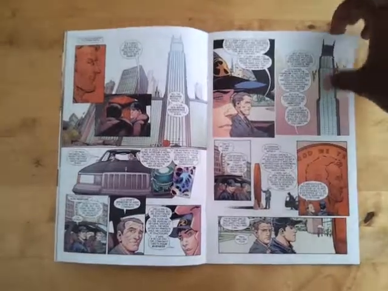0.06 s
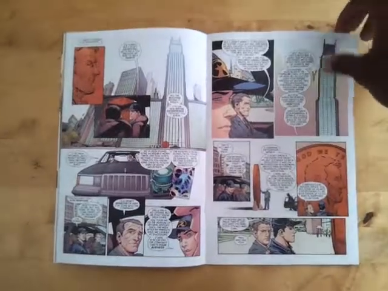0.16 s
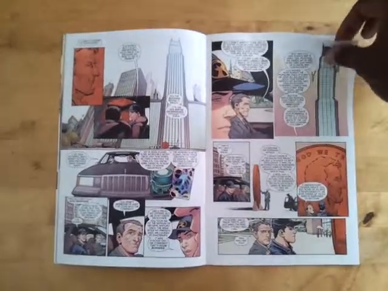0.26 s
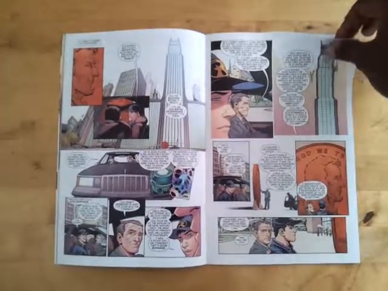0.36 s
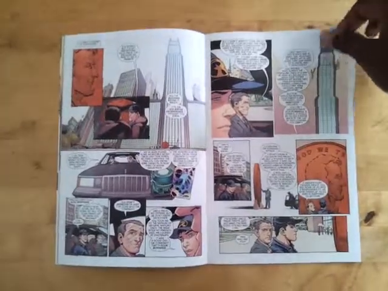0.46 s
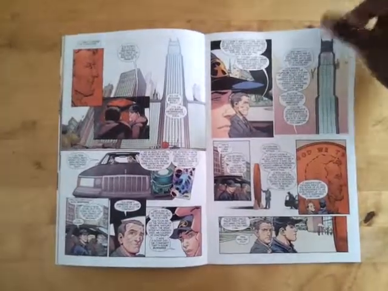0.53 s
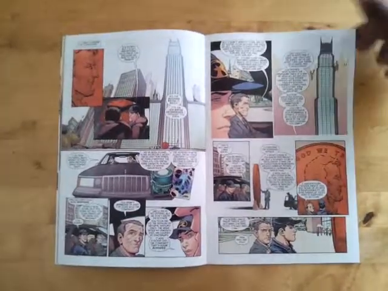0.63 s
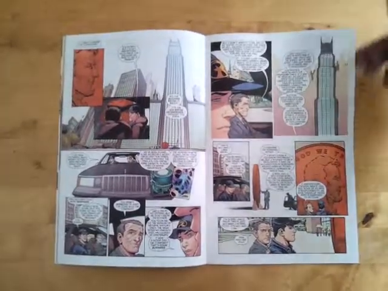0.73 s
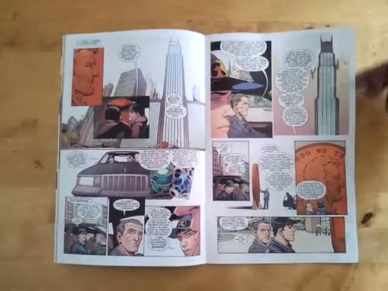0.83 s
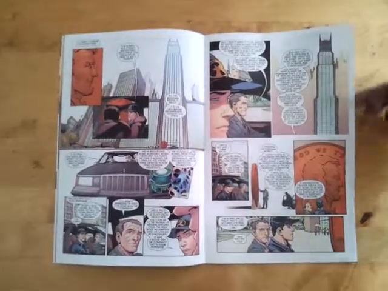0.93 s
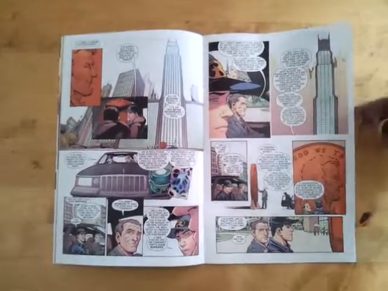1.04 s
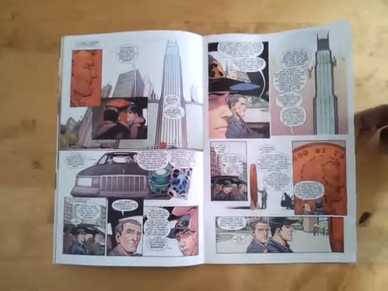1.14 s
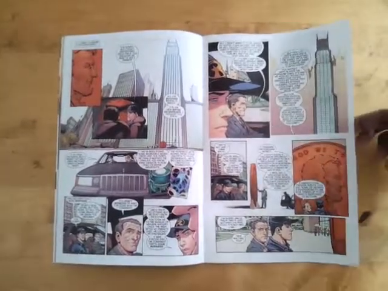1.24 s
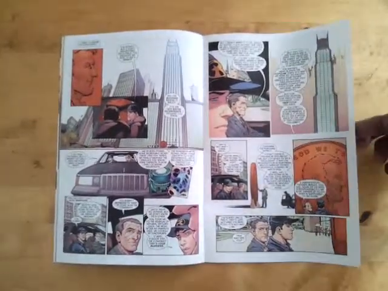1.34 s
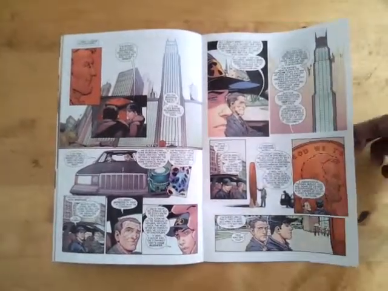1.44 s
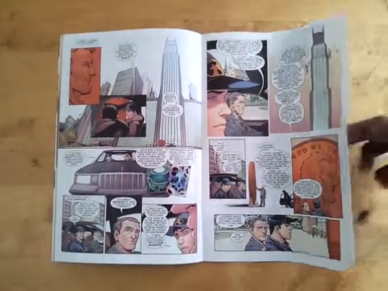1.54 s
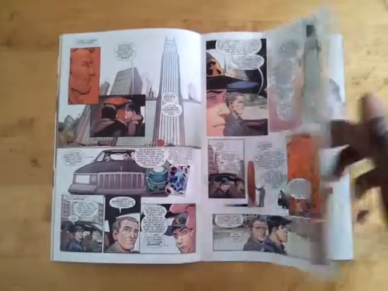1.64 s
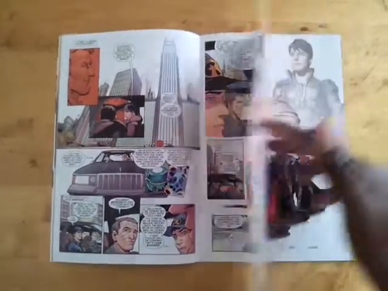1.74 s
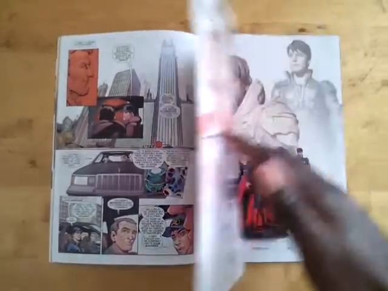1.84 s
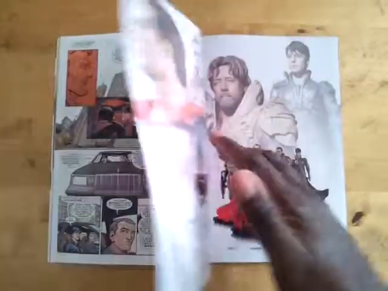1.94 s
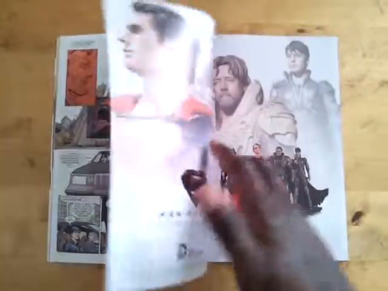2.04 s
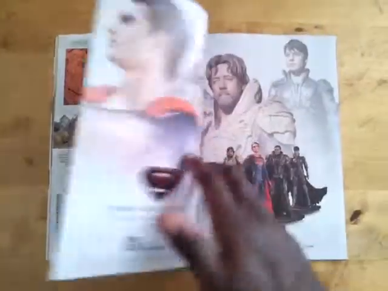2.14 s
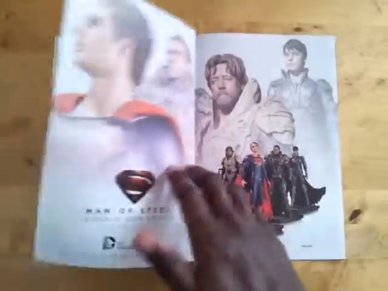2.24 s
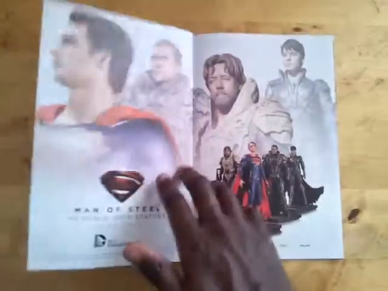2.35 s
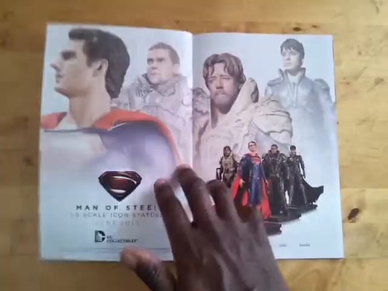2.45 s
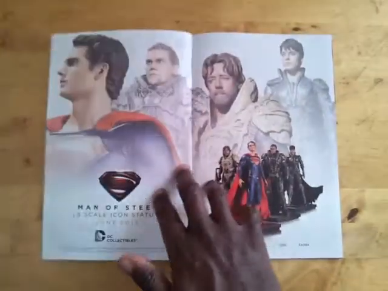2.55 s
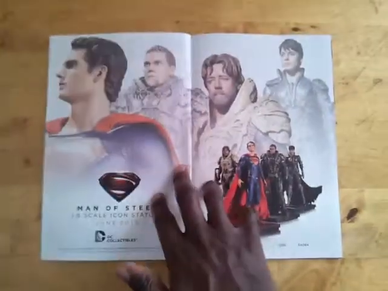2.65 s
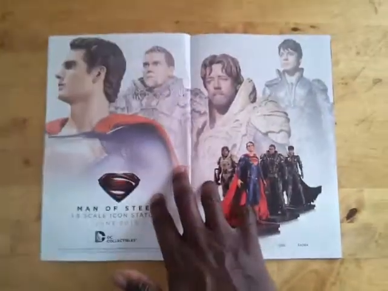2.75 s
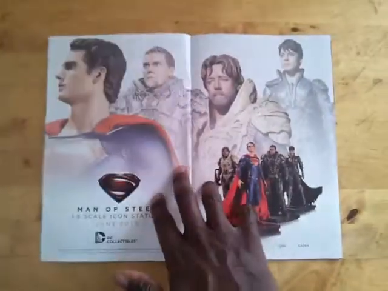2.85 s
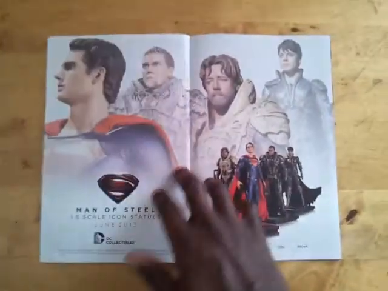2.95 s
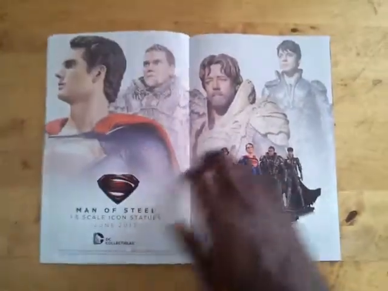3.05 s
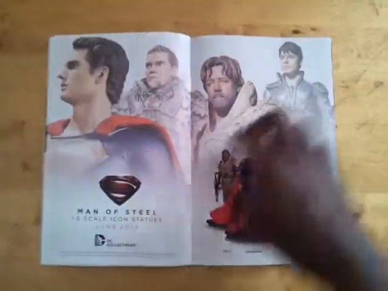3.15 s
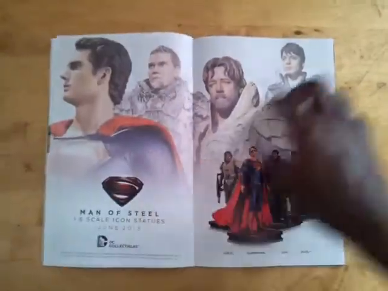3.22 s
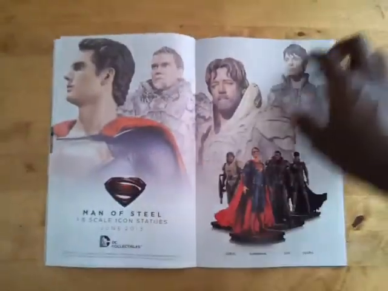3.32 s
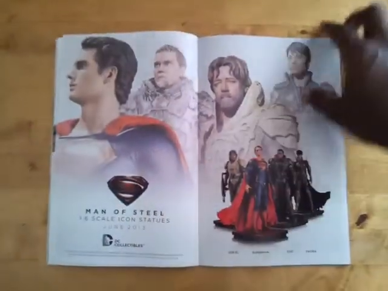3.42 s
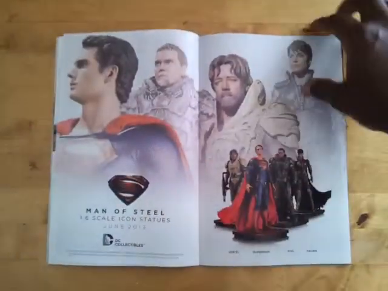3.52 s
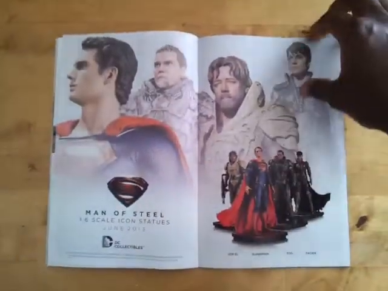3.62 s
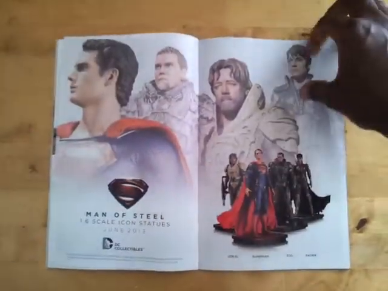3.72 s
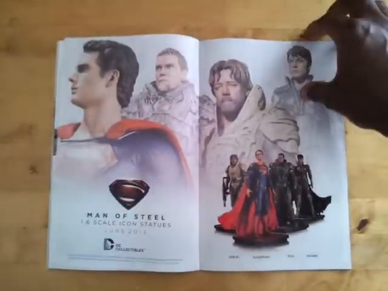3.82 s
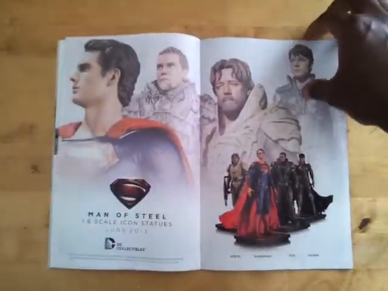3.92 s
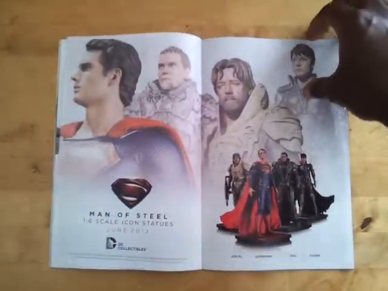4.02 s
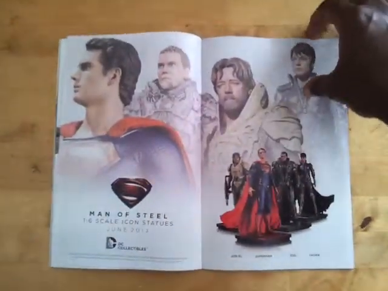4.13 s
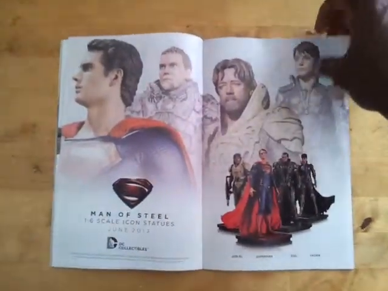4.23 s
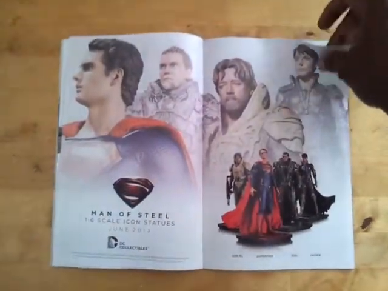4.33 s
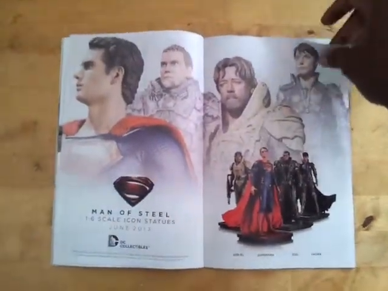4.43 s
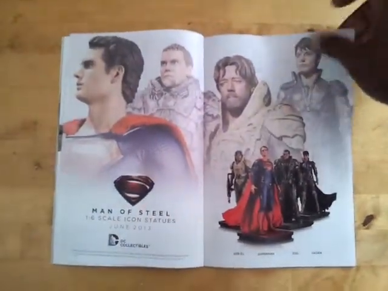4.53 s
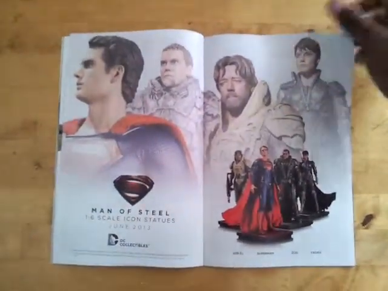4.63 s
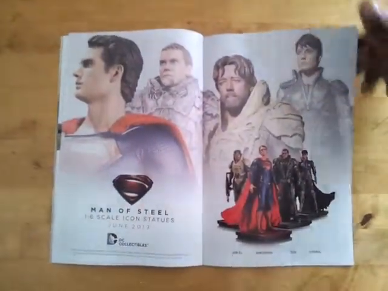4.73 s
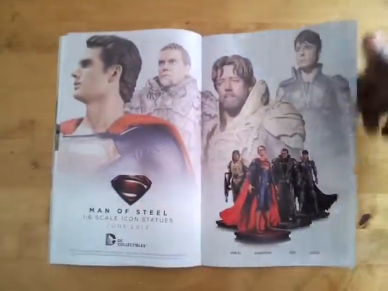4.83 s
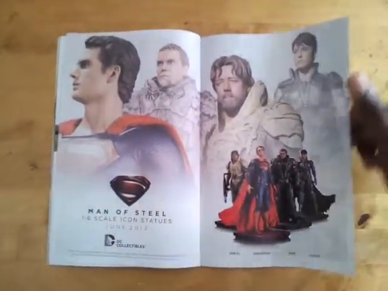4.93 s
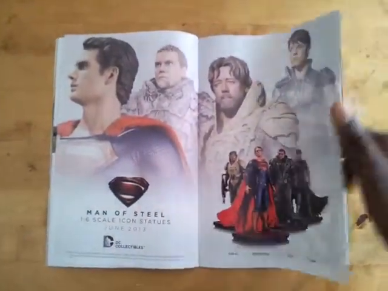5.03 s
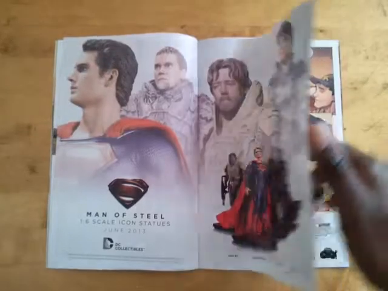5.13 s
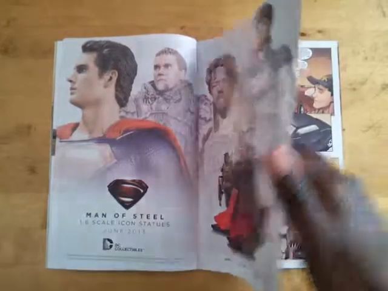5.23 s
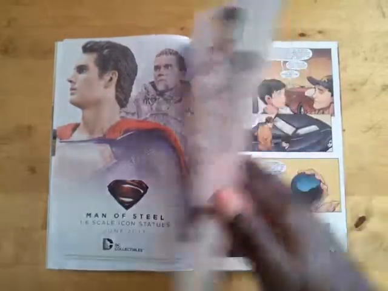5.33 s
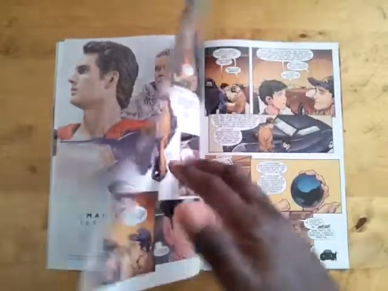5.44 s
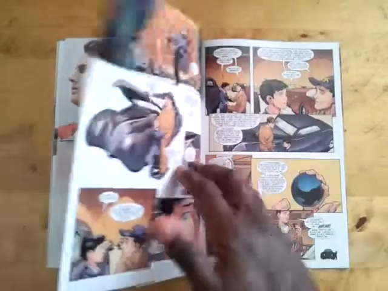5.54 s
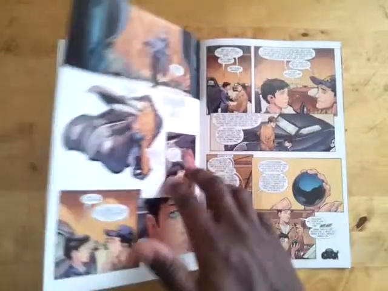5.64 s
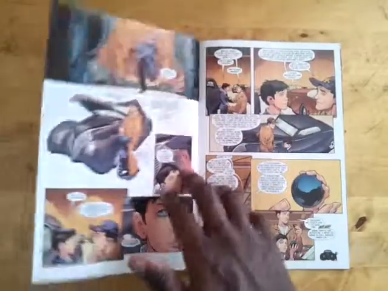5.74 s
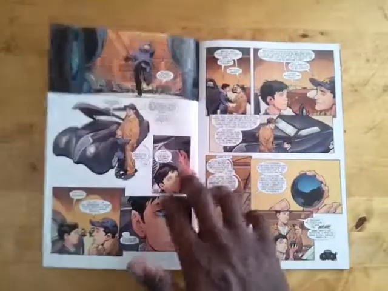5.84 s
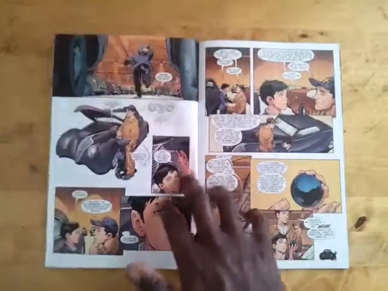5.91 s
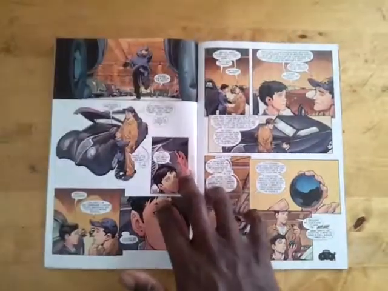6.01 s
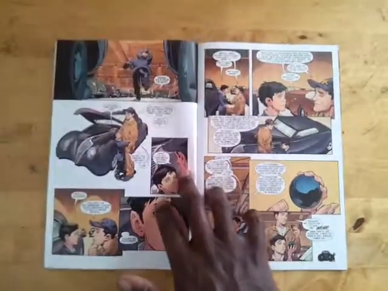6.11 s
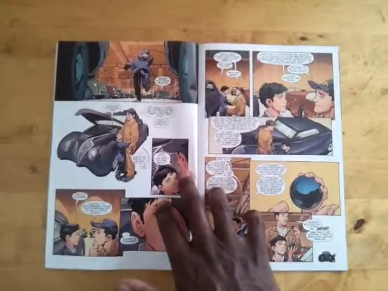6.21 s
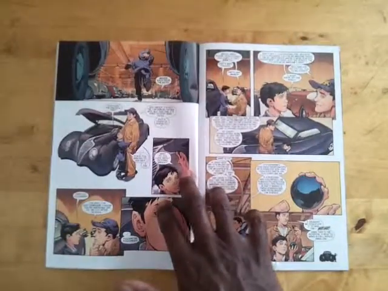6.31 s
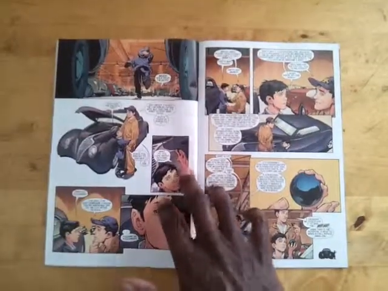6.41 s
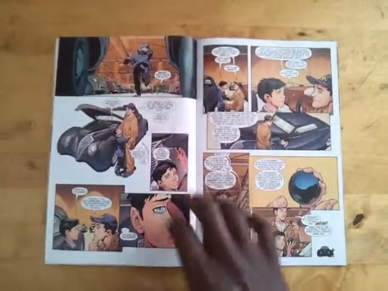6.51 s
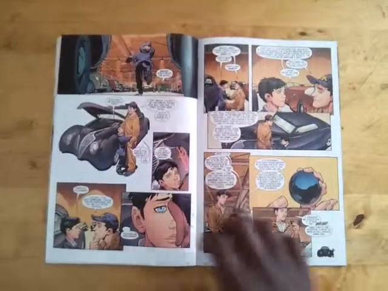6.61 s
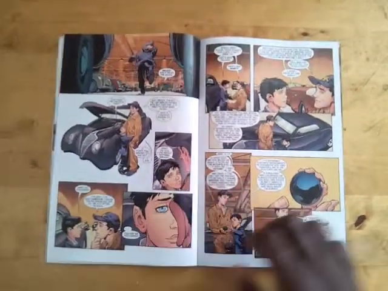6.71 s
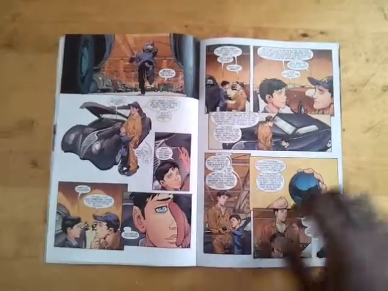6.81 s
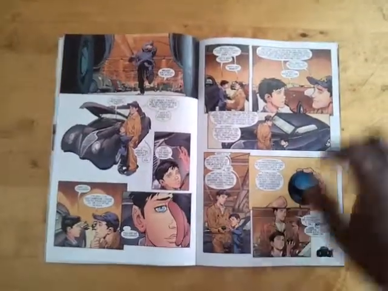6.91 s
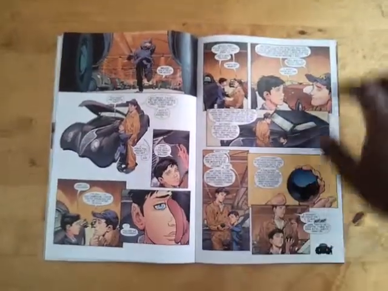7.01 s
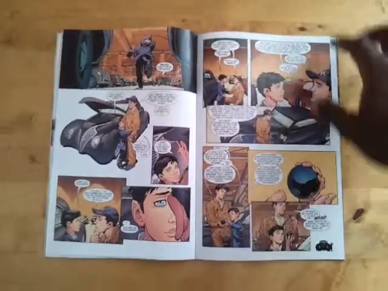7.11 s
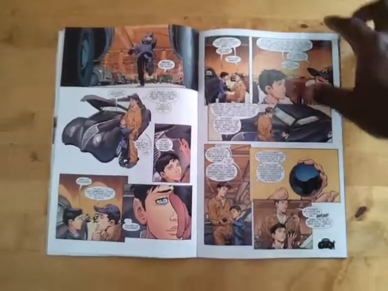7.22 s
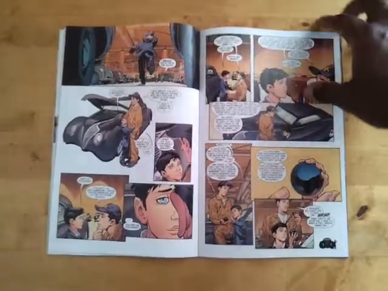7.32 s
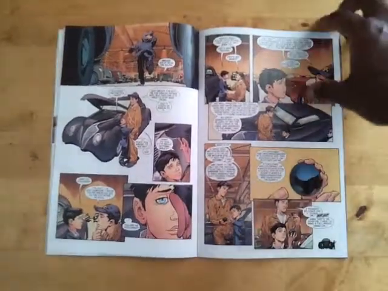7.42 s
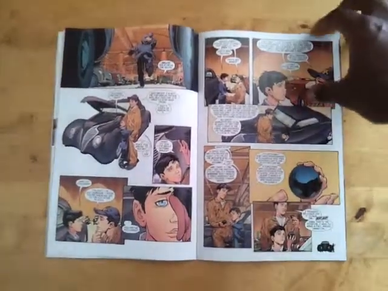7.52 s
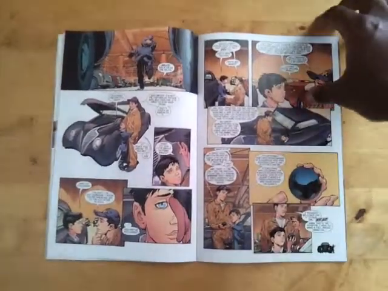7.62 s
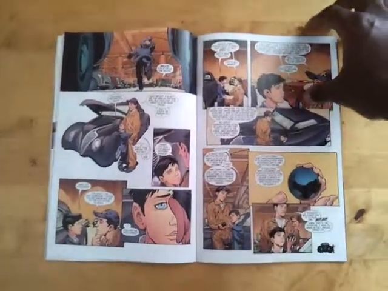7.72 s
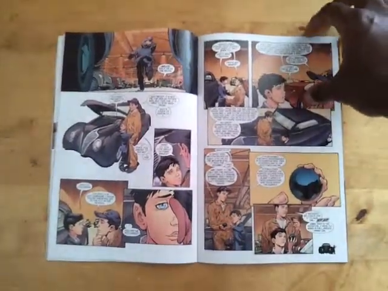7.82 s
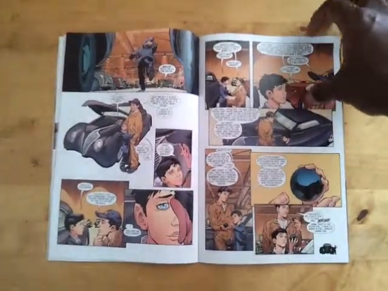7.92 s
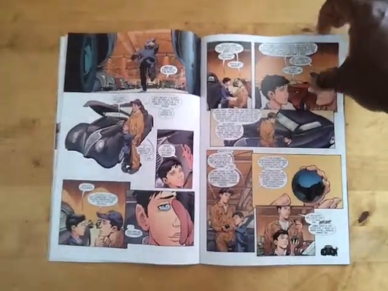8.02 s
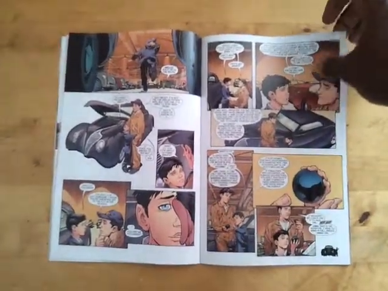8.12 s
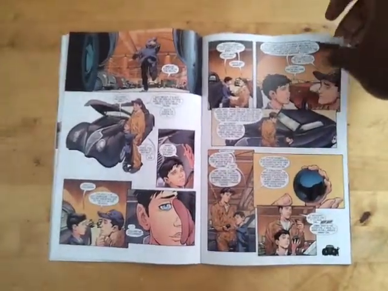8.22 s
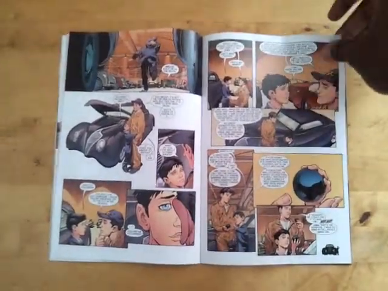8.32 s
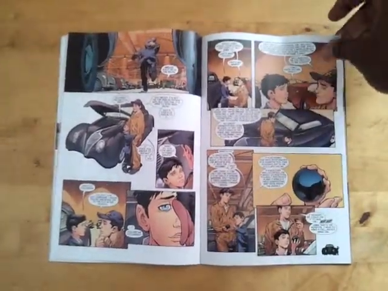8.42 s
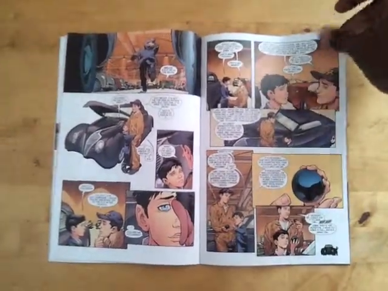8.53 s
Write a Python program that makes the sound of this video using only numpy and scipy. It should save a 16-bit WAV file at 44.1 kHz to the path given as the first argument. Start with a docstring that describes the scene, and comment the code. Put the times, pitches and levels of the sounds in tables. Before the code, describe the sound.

Close, dry mono sound of thin magazine paper on a wooden table. Bright fingertip hisses and clicks come first, then a soft flapping page turn with crackles. Fingers work the next corner with brisk scratches and snaps, and the second sheet cracks over and settles. Light touches, near silence, then another bright scrape and flick at the end. Faint room tone and small air puffs lie beneath.

```python
"""A small, quiet room with a wooden table: a hand leafs through a comic book close to a mono microphone.
Fingers slide over glossy paper (stick-slip noise) and flick the corner free; the lifted sheet bends
(a swarm of soft impulses), buckles with sharp snaps (filtered impulses with decaying rattle) and settles
on the other side. Two pages are turned and a third is picked up. Shaped noise gives room tone, rumble and air."""
import sys
import numpy as np
from scipy import signal
from scipy.fft import rfft, irfft, next_fast_len
from scipy.io import wavfile
from scipy.ndimage import uniform_filter1d, map_coordinates

SR = 44100
rng = np.random.default_rng(int(sys.argv[2]) if len(sys.argv) > 2 else 0)


def output_pcm(signal):
    """Save a mono or channel-first signal as 16-bit PCM at the path in sys.argv[1].

    Samples are clipped to [-1, 1] before scaling.
    """
    pcm = np.clip(np.atleast_2d(signal).T, -1, 1) * 32767
    wavfile.write(sys.argv[1], SR, np.round(pcm).astype(np.int16))


N = 377496


def amp(db):
    """Decibels to gain."""
    return 10 ** (np.asarray(db) / 20)


def unit(x):
    """Scale to rms 1."""
    return x / np.sqrt(np.mean(x ** 2) + 1e-20)


def along(points, f_hz):
    """Interpolate (f/Hz, value) points on a log-frequency axis."""
    point_hz, value = np.transpose(points)
    return np.interp(np.log(f_hz + 1), np.log(point_hz + 1), value)


def wobble(rate_hz):
    """Smooth random curve through rate_hz Gaussian knots a second."""
    knots = rng.standard_normal(int(N * rate_hz / SR) + 4)
    return map_coordinates(knots, [np.arange(N) * rate_hz / SR])


def filtered(x, response):
    """Multiply the spectrum of x by response(f_hz)."""
    size = next_fast_len(N + SR // 2)
    f_hz = np.fft.rfftfreq(size, 1 / SR)
    return irfft(rfft(x, size) * response(f_hz), size)[:N]


def coloured(x, spectrum):
    """Filter x by a (f/Hz, level/dB) spectrum, then scale to rms 1."""
    return unit(filtered(x, lambda f_hz: amp(along(spectrum, f_hz))))


def causal(gain):
    """Minimum-phase impulse response of a gain curve: it rings only after the blow."""
    cepstrum = irfft(np.log(np.maximum(gain, 1e-6)))
    half = len(cepstrum) // 2
    cepstrum[1:half] *= 2
    cepstrum[half + 1:] = 0
    return irfft(np.exp(rfft(cepstrum)))


def slips(rate_hz, spread_db):
    """Stick-slip: random impulses of either sign and uneven size, rate_hz a second on average, at rms 1."""
    hits = rng.random(N) < rate_hz / SR
    sign = rng.choice([-1, 1], N)
    size = amp(spread_db * rng.standard_normal(N))
    return unit(hits * sign * size)


def arches(movements, peak, steepness):
    """Gain per level column: each movement swells and dies in one arch; overlaps add in power.

    peak: share of the length at which it peaks; steepness: exponent of the flanks."""
    t = np.arange(N) / SR
    power = np.zeros((len(movements[0]) - 2, N))
    for start_s, length_s, *levels_db in movements:
        during = (t > start_s) & (t < start_s + length_s)
        share = (t[during] - start_s) / length_s
        phase = np.interp(share, [0, peak, 1], [0, np.pi / 2, np.pi])
        arch = np.abs(np.sin(phase)) ** steepness
        power[:, during] += np.outer(amp(levels_db), arch) ** 2
    return np.sqrt(power)


def room(x, build_s=0.0021, early=0.37, early_decay_s=0.0068):
    """Table and near walls answer first, then a diffuse noise tail decays at a rate set by frequency."""
    # reverberation: f/Hz, t60/s
    walls = [(300, 0.85), (1500, 0.32), (5000, 0.36), (11000, 0.35)]
    f_hz, t, noise = signal.stft(rng.standard_normal(SR // 2), SR, nperseg=256)
    decay = amp(-60 * t / along(walls, f_hz)[:, None])
    tail = signal.istft(noise * decay, SR, nperseg=256)[1]
    age_s = np.arange(len(tail)) / SR
    tail = tail * (1 - np.exp(-(age_s / build_s) ** 2))
    tail = tail * (1 + early * np.exp(-age_s / early_decay_s))
    return signal.fftconvolve(x, tail / np.linalg.norm(tail))[:N]


def room_tone():
    """Steady room tone: stationary shaped noise."""
    # relative spectrum: f/Hz, level/dB
    tone_spectrum = [(35, -43), (60, -7.5), (102, -3), (136, -6), (265, -7.5), (309, -10), (413, -10),
                     (751, -12.5), (821, -15), (1310, -16.5), (1780, -18.5), (11200, -23.5), (12000, -31.5),
                     (15600, -55), (22000, -120)]
    return amp(-59.0) * coloured(rng.standard_normal(N), tone_spectrum)


def rumble():
    """Low background rumble: shaped noise on a slow level curve."""
    # level curve before a fixed trim: t/s, level/dB
    rumble_levels = [(0.0, -51.5), (1.22, -61.5), (7.94, -69), (8.56, -63)]
    # relative spectrum: f/Hz, level/dB
    rumble_spectrum = [(50, -17), (90, -20), (125, 5), (180, -6), (280, 0.5), (450, -9.5), (750, -6.5),
                       (1500, -14), (4000, -27)]
    trim_db = -0.5
    level_db = np.interp(np.arange(N) / SR, *np.transpose(rumble_levels)) + trim_db
    return amp(level_db) * coloured(rng.standard_normal(N), rumble_spectrum)


def air_puffs(still_air_db=-67):
    """Hand and page push air onto the microphone: low noise in slow puffs over a steady floor."""
    # puffs: start t/s, length/s, peak level/dB
    puff_rows = [(0.0, 0.5, -62.5), (0.9, .6, -64.5), (1.7, 1.07, -59.5), (4.1, .15, -57),
                 (5.05, 0.48, -55), (8.1, 0.72, -61)]
    # relative spectrum: f/Hz, level/dB
    air_spectrum = [(10, -29), (24, -1.5), (34, -4), (46, -3), (70, -37), (200, -36)]
    puff_gain, = arches(puff_rows, peak=0.42, steepness=0.39)
    gain = np.hypot(amp(still_air_db), puff_gain)
    return gain * coloured(rng.standard_normal(N), air_spectrum)


def bending():
    """Swarm of soft little buckles through the sheet as it swings over, lands and is smoothed down."""
    # flexes: start t/s, length/s, peak level before wobble/dB
    flex_rows = [(1.885, 0.046, -49), (1.93, .135, -43), (2.05, 0.3, -51.5), (2.245, .05, -47),
                 (2.275, 0.037, -43), (2.45, 0.094, -63), (2.98, 0.051, -57.5), (5.08, 0.64, -60),
                 (5.25, .03, -51), (5.272, 0.047, -43.5), (5.525, .06, -52), (5.645, 0.052, -45),
                 (5.69, .24, -59), (5.795, 0.048, -54), (6.46, 0.028, -57)]
    # relative spectrum: f/Hz, level/dB
    bend_spectrum = [(150, -21), (340, -8), (520, -7.5), (750, 0), (1050, 2), (1500, -2), (2200, -4),
                     (3200, -13), (5000, -21), (8000, -20), (12000, -45)]
    gain, = arches(flex_rows, peak=0.4, steepness=0.43)
    unevenness = amp(1.3 * wobble(60))
    return gain * unevenness * coloured(slips(rate_hz=5000, spread_db=4), bend_spectrum)


def sliding(edge_hz=6700, edge_width_hz=750, light_db=-59, blend_db=3.5, most_narrow=0.45):
    """Fingers and sheets rub: paper fibres catch and slip, the edge hisses and the sheet sounds along."""
    # strokes: start t/s, length/s, peak hiss level/dB, peak sheet body level/dB
    stroke_rows = [(0.03, 0.13, -50.5, -60), (0.19, 0.067, -49, -59.5), (0.282, 0.2, -41, -49.5),
                   (0.49, 0.086, -52.5, -59.5), (0.56, 0.69, -61, -65), (1.0, 0.77, -64.5, -64.5),
                   (1.5, 0.24, -58.5, -59), (1.87, .1, -62, -62), (2.64, 0.086, -64, -70),
                   (3.61, 0.075, -54.5, -63), (4.06, 0.1, -48.5, -60), (4.2, 0.094, -56, -57.5),
                   (4.305, 0.042, -42.5, -48), (4.45, .08, -56, -62), (4.6, 0.13, -51.5, -62),
                   (4.65, 0.18, -58.5, -55), (4.84, 0.16, -52, -54.5), (4.96, 0.33, -57.5, -61.5),
                   (5.02, .045, -53, -51), (5.26, .06, -56, -51), (7.43, 0.053, -62, -65),
                   (7.52, 0.074, -60.5, -67), (7.965, .13, -45.5, -60.5), (8.11, 0.13, -55, -61),
                   (8.235, 0.049, -48.5, -57), (8.296, .1, -41, -48), (8.32, 0.048, -35.5, -45.5),
                   (8.45, 0.095, -44.5, -56)]
    # relative spectrum of the hiss: f/Hz, level/dB
    hiss_spectrum = [(1500, -23), (2900, -18.5), (3700, -4.5), (4800, -4), (5700, 2.5), (6650, 6.5),
                     (7400, -2), (8400, -3.5), (9500, -22), (12000, -24)]
    # relative spectrum of the sheet body: f/Hz, level/dB
    body_spectrum = [(250, -18), (600, -5), (1100, -1.5), (1600, 2), (2200, 6), (3000, 0), (4100, -10),
                     (5200, -25), (7000, -9)]
    hiss_gain, body_gain = arches(stroke_rows, peak=0.33, steepness=0.7)
    unevenness_db = 1.03 * wobble(70) + 0.62 * wobble(250)
    friction = slips(rate_hz=6500, spread_db=3.5) * amp(unevenness_db)

    def edge_resonance(f_hz):
        """Two-pole band-pass of the paper edge."""
        damping = 1j * f_hz * edge_width_hz
        return damping / (edge_hz ** 2 - f_hz ** 2 + damping)

    # light touch: large share in the narrow edge resonance; firm scrape: broad
    hiss_db = 20 * np.log10(hiss_gain + 1e-9)
    narrow = most_narrow / (1 + np.exp((hiss_db - light_db) / blend_db))
    edge = unit(filtered(friction, edge_resonance))
    broad = coloured(friction, hiss_spectrum)
    hiss = np.sqrt(narrow) * edge + np.sqrt(1 - narrow) * broad
    return hiss_gain * hiss + body_gain * coloured(friction, body_spectrum)


def buckle(t60_s, rattle=0.22, size=4096, smooth_bins=120):
    """Spectrum of a sharp release, then bending waves that rattle through the sheet and die."""
    t = np.arange(size) / SR
    # quick flick: nearly one impulse; slow buckle: a whole cascade
    rattle_gain = rattle * (t60_s / 0.015) ** 0.28
    push = rattle_gain * rng.standard_normal(size) * amp(-60 * t / t60_s)
    push[0] = 1
    waves = rfft(push)
    # even out the energy over broad bands; narrow peaks stay random per snap
    flatten = uniform_filter1d(np.abs(waves) ** 2, smooth_bins) ** -.5
    return waves * rfft(causal(flatten))


def snap(flap_db, crease_db, crack_db, ring_hz, ring_db=9, ring_width_hz=170, bass_db=-15, top_db=-19,
         hardening=0.98, size=4096):
    """Paper response to one snap: the sheet flaps, the crease crackles, the edge cracks, a patch rings."""
    f_hz = np.fft.rfftfreq(size, 1 / SR)
    # the hardest buckles let go fastest and reach highest
    top_db = top_db + hardening * max(0, min(crease_db, crack_db))
    colour = [(60, flap_db + bass_db - 13), (340, flap_db + bass_db), (660, flap_db - 5.5),
              (1000, flap_db), (1400, flap_db),
              (2000, crease_db - 0.5), (2900, crease_db - 2), (4400, crease_db),
              (5300, crack_db), (6500, crack_db + 2.5), (8200, crease_db * 0 + crease_db - 4),
              (9600, crack_db + top_db + 3.5), (12000, crack_db + top_db)]
    # pitch set by the size of the patch that pops through
    ring = ring_db / (1 + ((f_hz - ring_hz) / ring_width_hz) ** 2)
    return causal(amp(along(colour, f_hz) + ring))


def snaps():
    """The corner flicks off the fingertip, the bent sheet pops through, and fingertips tap the page softly:
    direct sound plus room echo."""
    # flicks, buckles and soft finger taps: t/s, sheet flap level/dB, crease level/dB, edge crack level/dB,
    # t60/s, ring f/Hz
    snap_rows = [(0.029, -15, -3, 6.5, .011, 3900), (0.186, -23, -17.5, -16, .02, 2400),
                 (0.208, -18, -18, -18, 0.032, 2360), (0.309, -12.5, -14, -16, .015, 1400),
                 (1.586, -22, -19.5, -31, .027, 2360), (1.939, -3, -7.5, -39, 0.1, 2250),
                 (1.961, -4, -4.5, -7, 0.031, 1980), (2.022, 0, -5, -28, 0.087, 1710),
                 (2.1047, -17, -14, -16.5, .022, 1040), (2.12, -17, -12, -16, 0.081, 1200),
                 (2.1482, 4, 6, -5.5, 0.068, 1270), (2.315, -6, -9, -16, 0.037, 1100),
                 (2.4382, -7, -13.5, -21, 0.029, 890), (2.9602, -14, -20, -31, 0.015, 1560),
                 (2.9807, -4, -5.5, -15, .014, 2050), (2.992, -13, -16, -18, .013, 1390),
                 (3.62, -22, -25, -11.5, 0.029, 1260), (4.111, -18, -10.5, 3, 0.006, 4100),
                 (4.1154, -12, -1, 10, 0.015, 4330), (4.1169, -6.5, -10, 8, 0.012, 1790),
                 (4.132, -10, -3.5, -8, .036, 2670), (4.237, -22, -13.5, -19, .017, 2340),
                 (4.273, -5, -2, -10, 0.056, 2160), (4.283, -6.5, -2, 4, 0.017, 2150),
                 (4.3296, -9, -11, -17, 0.011, 1040), (4.3544, -7, -4.5, -4, 0.037, 1510),
                 (4.397, 2.5, 1.5, 2.5, 0.029, 1550), (4.437, 1, 2.5, 6.5, 0.023, 2220),
                 (5.2651, -16.5, -8, -7, 0.0075, 880), (5.401, 4, 11, 8.5, 0.029, 2090),
                 (5.581, -6, -16, -27, 0.091, 1600), (5.635, -5.5, -9, -28, 0.047, 1114),
                 (5.704, -14, -11, -8, 0.07, 3730), (5.7268, -8.5, -35, -21, .02, 910),
                 (5.9988, -14, -33, -37, .019, 1570), (6.4431, -8.5, -4.5, -8.5, 0.017, 1400),
                 (6.562, -19, -18.5, -19.5, .015, 2100), (6.661, -17.5, -42, -44, 0.013, 1010),
                 (7.764, -33, -35, -25, .012, 3000), (7.922, -32, -20.5, -5.5, 0.025, 1580),
                 (7.964, -17, -5.5, 4, 0.018, 4070), (8.069, -23, -22, -7, .028, 2690),
                 (8.075, -27, -9, -12, 0.019, 3640), (8.089, -19, -13, -29, .02, 1010),
                 (8.414, -15, -13, -8, .035, 2150), (8.4408, 0.5, 0.5, 5, 0.01, 1530)]
    out = np.zeros(N + SR)
    for start_s, flap_db, crease_db, crack_db, t60_s, ring_hz in snap_rows:
        paper = snap(flap_db, crease_db, crack_db, ring_hz)
        direct = irfft(rfft(paper) * buckle(t60_s))
        # the room collects sound from all sides of the sheet: no rattle peaks, weaker ring
        echo = amp(-7.5) * room(snap(flap_db, crease_db, crack_db, ring_hz, ring_db=7.5))
        start = round(start_s * SR)
        out[start:][:len(direct)] += direct
        out[start:][:len(echo)] += echo
    return out[:N]


def scene():
    """Background, rustle with its room echo, and snaps; the same in both channels."""
    background = room_tone() + rumble() + air_puffs()
    rustle = bending() + sliding()
    mono = background + rustle + amp(-10) * room(rustle) + snaps()
    return np.array([mono, mono])


def record(dry, top_hz=12050):
    """The recorder keeps nothing above its band limit."""
    return np.array([filtered(channel, lambda f_hz: f_hz < top_hz) for channel in dry])


dry = scene()
out = record(dry)
output_pcm(out)
```